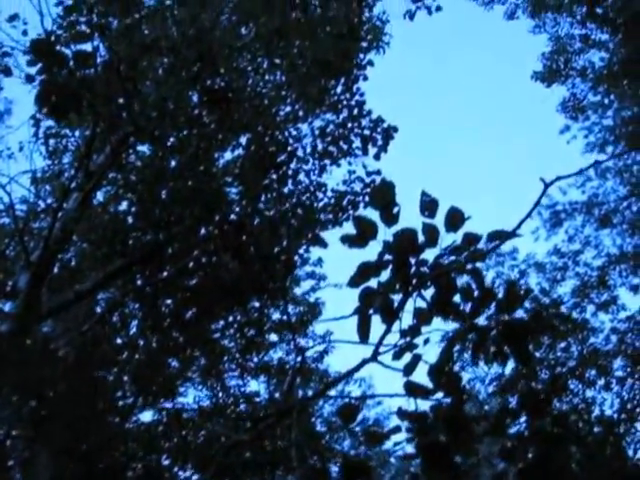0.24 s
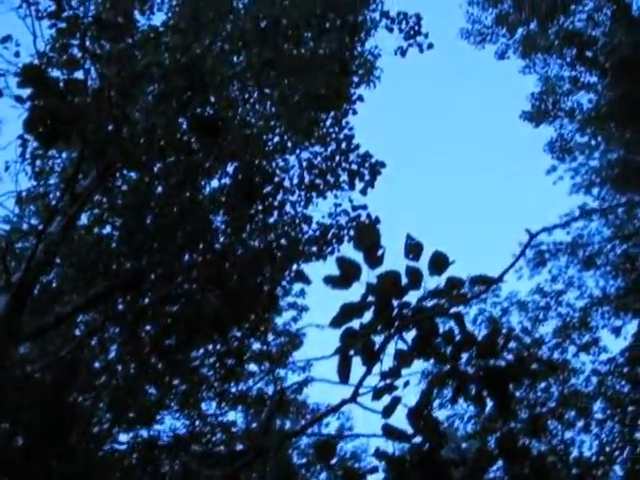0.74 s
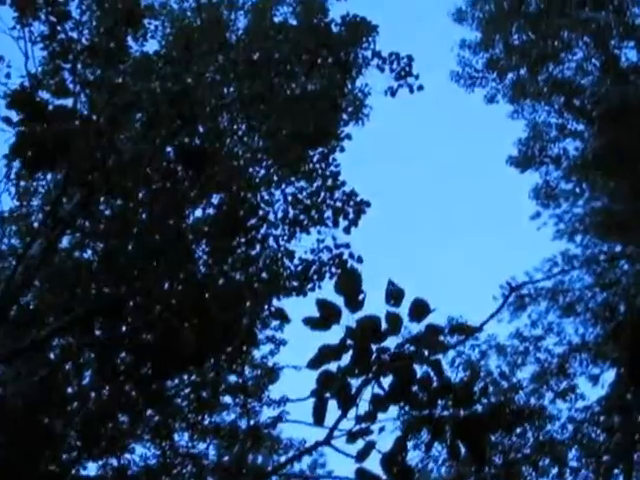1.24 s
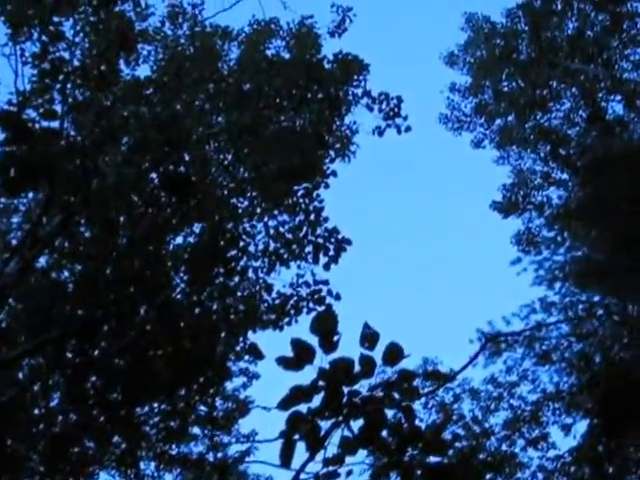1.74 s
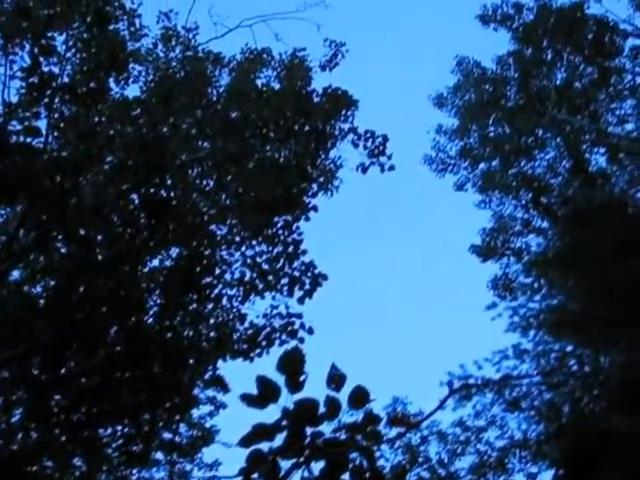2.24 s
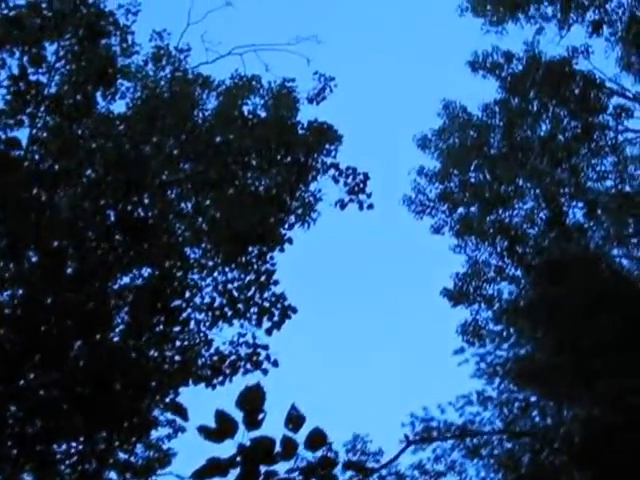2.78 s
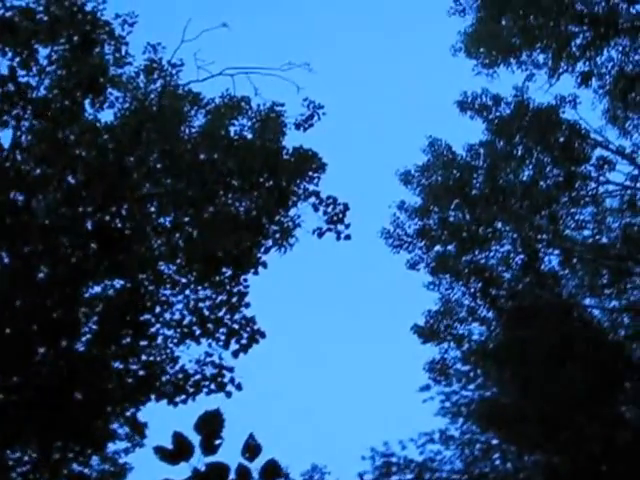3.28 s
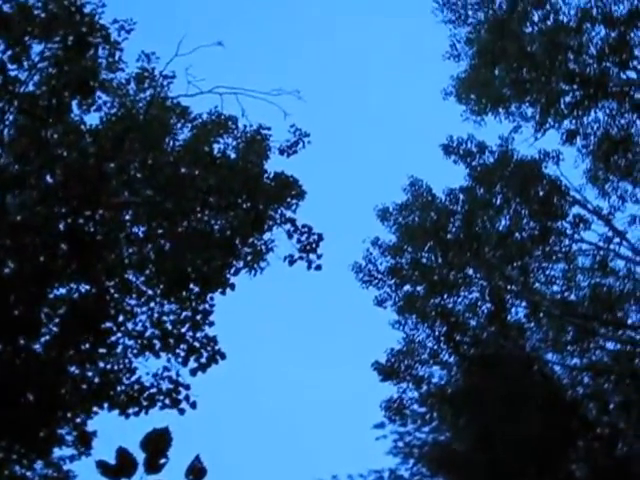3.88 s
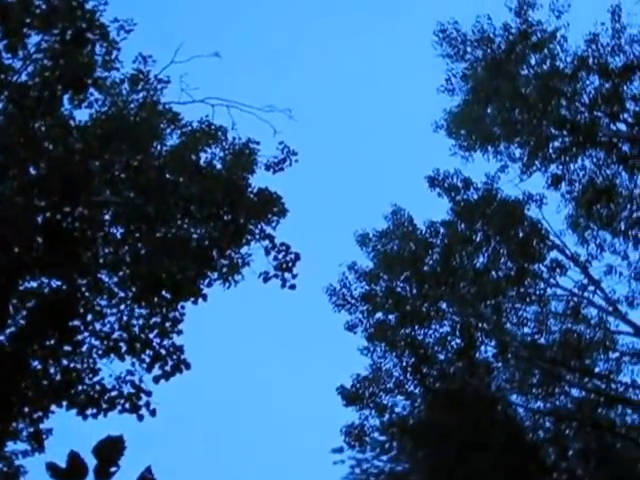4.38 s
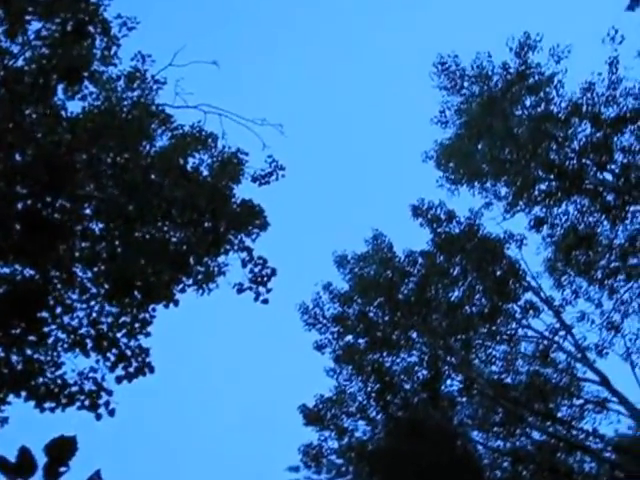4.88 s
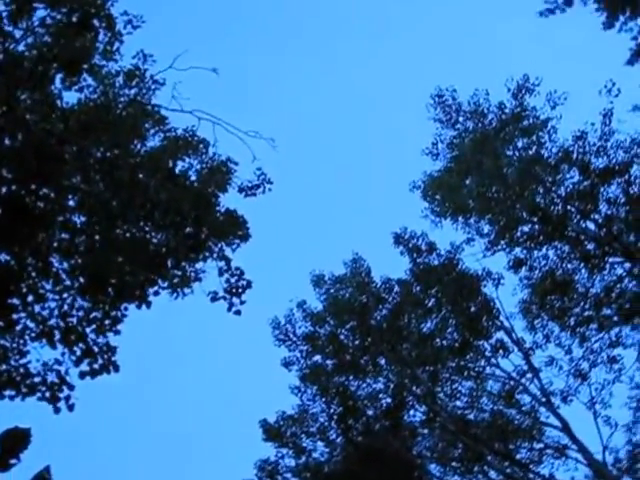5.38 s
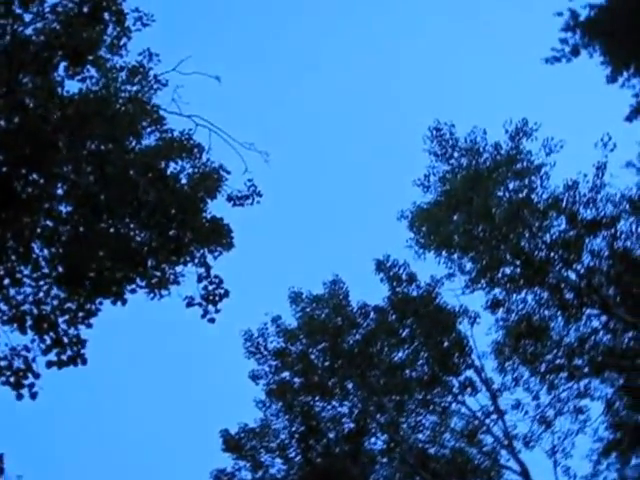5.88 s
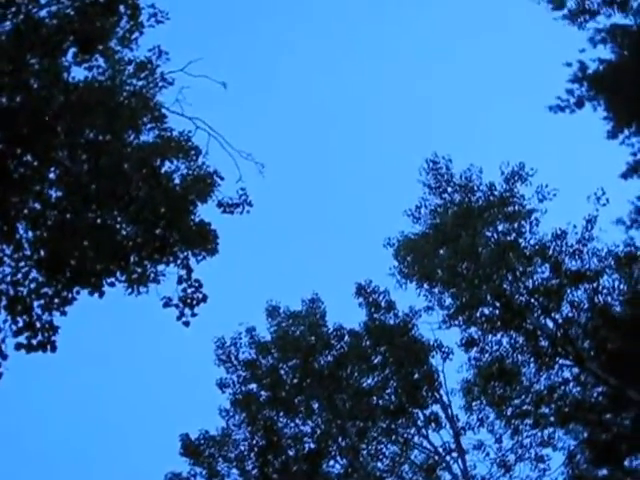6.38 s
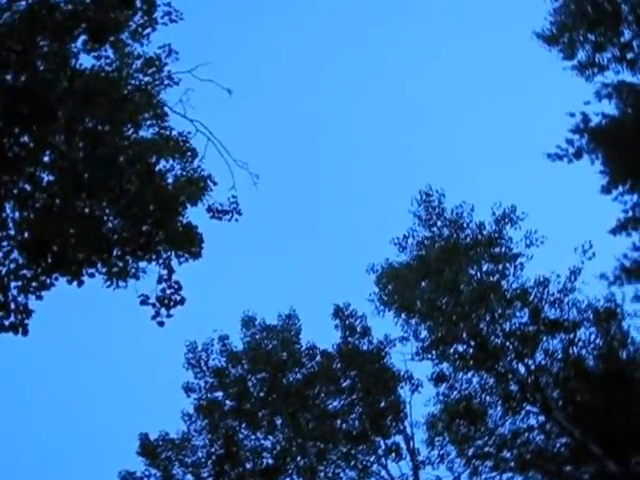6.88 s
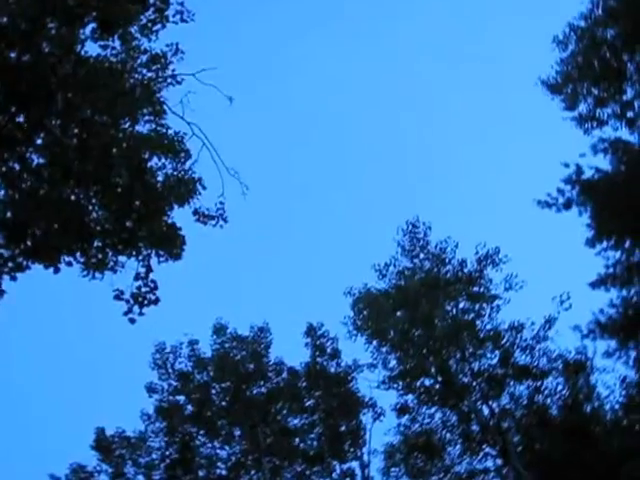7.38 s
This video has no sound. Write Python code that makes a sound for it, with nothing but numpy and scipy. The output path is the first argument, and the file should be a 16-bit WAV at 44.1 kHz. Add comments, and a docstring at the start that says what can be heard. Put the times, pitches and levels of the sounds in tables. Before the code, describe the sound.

In a leafy wood at dawn, a flycatcher gives a bright rising chip and short burr about every half to one second, answered by a fainter, echoing one. A sparrow whistles three long descending notes, then broken triplets, ending before the middle. A faint woodpecker roll passes beneath. Short slurred bird phrases follow, over a constant far chorus, hiss and leaf murmur, with low wind thumping a stereo microphone, mainly left later.

```python
"""Dawn birds in a leafy wood

Flycatchers call a quick rising chip and a burr, a sparrow whistles three long falling notes, then broken
triplets. Other birds slur short phrases or coo over a far chorus. Most are gliding, nearly pure tones;
the coo holds steady and the far chorus includes a noise wash. A woodpecker's roll and close ticks are
short ringing tones; wind, leaves, a low drone and hiss are shaped noise. Birds and drum get echoes off
the trunks, except the coo and the wash. All is heard at two microphone ports."""
import sys
import numpy as np
from scipy import signal
from scipy.fft import rfft, irfft, next_fast_len
from scipy.io import wavfile
from scipy.ndimage import uniform_filter1d

SR = 44100
rng = np.random.default_rng(int(sys.argv[2]) if len(sys.argv) > 2 else 0)


def int16_out(signal):
    """Quantize to a 16-bit WAV file."""
    q = np.round(np.clip(np.atleast_2d(signal).T, -1, 1) * 32767)
    wavfile.write(sys.argv[1], SR, q.astype(np.int16))


N = 336483


def undb(db):
    """Turn a level in dB into a plain gain."""
    return 10 ** (np.asarray(db) / 20)


def unit(x):
    """Scale a sound to an rms (average strength) of 1."""
    return x / np.sqrt(np.mean(x ** 2))


def track(table):
    """Join the points of a time table with straight lines, one curve per column."""
    s, *columns = np.transpose(table)
    return [np.interp(np.arange(N) / SR, s, column) for column in columns]


def coloured(shape, channels):
    """Noise whose spectrum follows (pitch_hz, level_db) points, scaled to rms 1."""
    size = next_fast_len(N)
    point_hz, point_db = np.transpose(shape)
    bin_hz = np.arange(1, size // 2 + 2) * SR / size
    level_db = np.interp(np.log(bin_hz), np.log(point_hz), point_db, left=-60, right=-60)
    white = rng.standard_normal((channels, size))
    return unit(irfft(rfft(white) * undb(level_db), size)[:, :N])


def walk(rate):
    """A random wandering level: held for 1 / rate seconds, smoothed twice, with spread 1."""
    hold = int(SR / rate)
    steps = np.repeat(rng.standard_normal(N // hold + 1), hold)
    smooth = uniform_filter1d(uniform_filter1d(steps, hold), hold)[:N]
    return smooth / smooth.std()


def add(bus, sound, s):
    """Mix a sound into the bus, starting at time s in seconds."""
    i = int(round(s * SR))
    lo, hi = max(i, 0), min(i + sound.shape[-1], N)
    if hi > lo:
        bus[..., lo:hi] += sound[..., lo - i:hi - i]


def placed(sound, pan_db, samples_per_db=2.5):
    """Place a sound: a positive pan is louder at the left port and moves its arrival there earlier."""
    # at pan 0 the right port is two samples ahead
    lead = int(round(np.mean(pan_db) * samples_per_db)) - 2
    left_wait, right_wait = max(-lead, 0), max(lead, 0)
    left = np.pad(sound * undb(pan_db / 2), (left_wait, right_wait))
    right = np.pad(sound * undb(-pan_db / 2), (right_wait, left_wait))
    return np.array([left, right])


def whistle(s, hz, db, octave_db=-38, smooth=True, loud_hz=0, db_per_khz=0):
    """A bird's nearly pure tone, gliding between turning points (s, hz, rms db), with a faint octave."""
    t = np.arange(s[0], s[-1], 1 / SR)
    place = np.interp(t, s, np.arange(len(s)))
    if smooth:  # ease off partly around each turning point
        place = place - np.sin(2 * np.pi * place) / (2 * np.pi) * 0.33
    hz = np.interp(place, np.arange(len(s)), hz)
    away_khz = abs(hz - loud_hz) / 1000  # distance from the throat's best pitch
    level_db = np.interp(t, s, db) + db_per_khz * (away_khz - away_khz.mean())
    fade = np.clip(np.minimum(t - s[0], s[-1] - t) / 0.00076, 0, 1)
    phase = 2 * np.pi * np.cumsum(hz) / SR
    tone = np.sin(phase) + undb(octave_db) * np.sin(2 * phase)
    return np.sqrt(2) * fade * undb(level_db) * tone


def ring(hz, t60):
    """A struck object's tone, dying by 60 dB in t60 seconds; contact lasts about half a cycle."""
    t = np.arange(int(t60 * SR)) / SR
    contact = np.minimum(2 * hz * t, 1)
    return np.sin(2 * np.pi * hz * t) * np.exp(-np.log(1000) * t / t60) * contact


WOOD_NEAR, WOOD_FAR = (0.58, 0), (0.8, -3)  # echo tails: (time to fall 60 dB in s, level_db)
FAR_DULL_HZ = 3630  # the far tail loses treble above this


def wood(x, grain_db=0.5):
    """Echoes scattered by trunks and leaves: a quick and a slow noise tail, different at each port."""
    t = np.arange(int(1.4 * SR)) / SR
    near, far = (undb(db - 60 * t / t60) * rng.standard_normal((2, len(t))) for t60, db in (WOOD_NEAR, WOOD_FAR))
    # random level changes make the first echoes uneven
    near = near * undb(grain_db * rng.exponential(size=(2, len(t))) * np.exp(-t / .025))
    # long paths through leaves lose treble
    far = signal.lfilter(*signal.butter(1, FAR_DULL_HZ, fs=SR), far)
    echoes = (near + far) * (t > 0.0018)  # no echo in the first 1.8 ms
    echoes /= np.sqrt(np.sum(echoes ** 2) / 2)  # unit energy at each port, on average
    return signal.fftconvolve(x[None], echoes, axes=1)[:, :N]


# wind strength at each port, before gusts and brightening: start_s, left_level_db, right_level_db
WIND_LEVEL = [(0.05, -73, -62), (0.59, -61, -56), (0.82, -64, -58), (1.3, -55, -49), (2.15, -55.5, -52.5),
              (2.79, -50.5, -48.5), (3.4, -52.5, -51.5), (3.65, -53.5, -76), (4.04, -45.5, -75),
              (4.45, -53.5, -57), (4.65, -43.5, -70), (4.9, -50, -66), (5.09, -44, -55), (5.2, -45.5, -62),
              (5.46, -37, -50), (5.55, -49.5, -60), (5.74, -30, -60), (5.79, -45, -60), (5.86, -30.5, -60),
              (5.98, -43.5, -58), (6.05, -38, -62), (6.28, -54, -59), (6.45, -56.5, -61), (6.9, -65, -51.5),
              (6.97, -68, -39.5), (7.12, -64, -44.5), (7.3, -62, -55)]
# tone of the wind rumble: pitch_hz, relative level_db per Hz
WIND_TONE = [(12, -48), (20, -12), (59, 0), (92, 1), (130, -4), (178, -11.5), (300, -29.5), (390, -31.5),
             (660, -120)]
GUST_SPLIT_HZ, GUST_USUAL_DB = 80, -44
GUST_BRIGHT = 0.27  # dB the highs gain, and the lows lose, per dB of wind above the usual


def wind():
    """Wind buffets each port on its own: low noise, with stronger gusts sounding brighter."""
    gusts_db = np.array([db + 3 * walk(18) for db in track(WIND_LEVEL)])
    buffet = coloured(WIND_TONE, channels=2)
    low = signal.filtfilt(*signal.butter(2, GUST_SPLIT_HZ, fs=SR), buffet)
    bright = undb(GUST_BRIGHT * (gusts_db - GUST_USUAL_DB))
    return (low / bright + (buffet - low) * bright) * undb(gusts_db)


# leaves and distance, before the mixing gains: start_s, level_db
MURMUR_LEVEL = [(0.0, -57), (0.85, -56.5), (1.53, -52.5), (2.51, -56.5), (7.63, -56.5)]
# tone of the murmur: pitch_hz, relative level_db per Hz
MURMUR_TONE = [(150, -7), (280, -4.5), (400, -2), (600, -4.5), (800, 1.5), (950, -5), (1250, -2),
               (1700, -7), (2400, -0.5), (4000, -19.5)]


def murmur(alike=.6, flutter_db=1.2):
    """Leaves and distance: fluttering noise, partly shared by the two ports."""
    flutter = undb(flutter_db * np.array([walk(9), walk(8.1)]))
    shared, opposite = coloured(MURMUR_TONE, channels=2) * flutter
    pair = np.sqrt(1 + alike) * shared + np.sqrt(1 - alike) * opposite * np.array([[1], [-1]])
    pair[0] = np.roll(pair[0], 5)  # it reaches the right port 5 samples earlier
    return pair * undb(track(MURMUR_LEVEL)[0] - 2.5)


# a low drone that comes and goes, before a 3.5 dB cut: start_s, level_db
DRONE_LEVEL = [(0, -67.5), (1.2, -63.5), (2.8, -71.5), (3.2, -74.5), (6.4, -83), (7.63, -73)]


def drone():
    """A low drone: a narrow band of noise near 270 Hz, the same at both ports."""
    band = coloured([(200, -34), (270, 8), (360, -25)], channels=1)
    return band * undb(track(DRONE_LEVEL)[0] - 3.5)


# tone of the circuit hiss: pitch_hz, relative level_db per Hz
HISS_TONE = [(100, -13), (2000, 2.5), (7500, 0.5), (9000, -4), (12500, -4), (14000, -9), (16000, -12)]


def hiss(level_db=-56.5, flutter_db=1.2):
    """The circuits hiss: separate noise at each port, with one shared flutter around its level."""
    return coloured(HISS_TONE, channels=2) * undb(level_db + flutter_db * walk(14))


# loudness of all the far birds, before the mix of songs and wash: start_s, level_db
CHORUS_LEVEL = [(0.0, -45.5), (0.66, -41.5), (1.4, -44.5), (3.08, -41.5), (6.0, -44), (7.63, -46.5)]
# the farthest birds, blurred to a wash: pitch_hz, relative level_db per Hz
WASH_TONE = [(1500, -14), (2100, -5.5), (2700, 5.5), (4000, 1), (5500, -0.5), (6800, -13), (7600, -45)]


def chorus(count=500, middle_hz=3300, spread=.22, swing=.16, note_s=.07):
    """Many far birds: random short slurs heard only as echo, over a wavering wash of noise."""
    song = np.zeros(N)
    for k, (when, pitch, size, *turns) in enumerate(rng.standard_normal((count, 7))):
        shift = spread * pitch + swing * np.array(turns)
        hz = middle_hz * np.exp(.65 * np.tanh(shift / .65))  # tanh limits the range
        level_db = 3 * size + np.array([1, -5.5, -3.0, -15.0])
        add(song, whistle(note_s * np.arange(4) / 3, hz, level_db), (k + when) * N / SR / count)
    wash = coloured(WASH_TONE, channels=2) * undb(-7 + 2.1 * np.array([walk(7), walk(8)]))
    return (unit(wood(song, grain_db=-1.5)) * undb(-7.0) + wash) * undb(track(CHORUS_LEVEL)[0])


# chip: climbs a bent quarter sine from a share of its top pitch, then holds
CHIP_S, CHIP_FROM = .029, .53  # length in s, starting share of the top pitch
CHIP_CLIMB, CHIP_ENDS_DB = 0.77, -19  # share of the time spent climbing, level of the ends against the middle
# burr: a scoop leads into quick swings between a low and a high pitch
BURR_AFTER_S, SCOOP_S = .092, .0055  # burr's end after the chip; scoop's start before the nominal first turn
SCOOP_HZ, SCOOP_DB = 2500, -8
SWING_S, LOW_HZ, HIGH_HZ = .004, 3452, 5827  # time between turns, and their nominal pitches
HIGH_DB, FIRST_DB = -3, 1  # high turns are softer; a small boost fades over the first turns
RISE_EARLY_S = .0012  # later high turns come early, so the pitch snaps up and slides down
BURR_LOUD_HZ, BURR_DB_PER_KHZ = 4760, -5  # loudest when passing the throat's pitch
TEMPO_SPREAD, TURN_SCATTER_DB, TURN_SPREAD = .03, 2.5, 0.0239  # chance in tempo, turn level, turn pitch
FAR_BELOW_DB = -30  # calls with a quieter chip come from the far perch
# flycatcher calls, before shaping; pan is left minus right:
# chip_time_s (near its middle), chip_top_pitch_hz, chip_level_db, burr_level_db, pan_db
FLYCATCHER_CALLS = [ (0.073, 6560, -38, -41.5, 4.5), (0.425, 6840, -26.5, -31.5, 6.5),
                    (0.876, 6650, -38.5, -42, 7.5), (1.246, 6725, -25.5, -30.5, -0.5),
                    (1.563, 7170, -49.5, -64, 0), (1.661, 6640, -38, -43.5, 10),
                    (2.086, 6730, -25, -30, -0.8), (2.683, 6950, -25.5, -31.5, -0.5),
                    (2.763, 6500, -37.5, -44, 10.5), (3.34, 6790, -24, -31, -0.5),
                    (3.73, 6440, -37.5, -44.5, 10.5), (4.367, 6740, -23.5, -31, -0.5),
                    (4.524, 6430, -38.5, -46.5, 10.5), (4.981, 6860, -25, -31, 5),
                    (5.403, 6470, -39.5, -47, 11), (6.266, 6705, -24, -31.5, 1.28),
                    (6.878, 6850, -24, -29, 1), (7.426, 6470, -40, -44, 5.5), (7.627, 6770, -44, -45, 5.5),
                    ]


def flycatchers(near_echo_db=-1.5, far_echo_db=6.5):
    """Flycatchers on two perches: a rising chip and a swinging burr, with more echo from the far one."""
    dry, wet = np.zeros((2, N)), np.zeros((2, N))
    u = np.linspace(0, 1, 30)
    climb = CHIP_FROM + (1 - CHIP_FROM) * np.sin(np.pi / 2 * np.minimum(u / CHIP_CLIMB, 1)) ** 1.3
    turn = np.arange(1, 10)
    is_high = turn % 2  # turns go high, low, high, ..
    # the first high turn comes late and rises less far
    turn_s = SWING_S * turn - RISE_EARLY_S * is_high * np.sign(turn - 2)
    turn_hz = LOW_HZ + (HIGH_HZ - LOW_HZ) * is_high * np.minimum(.38 * turn - .1, 1)
    turn_db = HIGH_DB * is_high + FIRST_DB * np.clip(1 - turn / 4.0, 0, 1)
    # put the scoop in front and a short upward flick at the end
    burr_s = np.r_[SWING_S - SCOOP_S, turn_s, SWING_S * turn[-1] + .001]
    burr_hz = np.r_[SCOOP_HZ, turn_hz, HIGH_HZ * 1.17]
    burr_shape_db = np.r_[SCOOP_DB, turn_db, -5]
    for s, top_hz, chip_db, burr_db, pan_db in FLYCATCHER_CALLS:
        tempo = 1 + TEMPO_SPREAD * np.tanh(rng.standard_normal())
        pitch, size = rng.standard_normal((2, len(burr_s)))
        chip_level_db = chip_db + CHIP_ENDS_DB * (2 * u - 1) ** 2
        chip = whistle(CHIP_S * u, climb * top_hz, chip_level_db, octave_db=-33.5, smooth=False)
        burr = whistle(burr_s * tempo, burr_hz * (1 + TURN_SPREAD * pitch),
                       burr_shape_db + burr_db + TURN_SCATTER_DB * size, octave_db=-31.5,
                       loud_hz=BURR_LOUD_HZ, db_per_khz=BURR_DB_PER_KHZ)
        perch = int(chip_db < FAR_BELOW_DB)  # 0 near, 1 far
        for note, at in ((chip, s - .47 * CHIP_S), (burr, s + BURR_AFTER_S - len(burr) / SR)):
            add(dry, placed(note, pan_db), at)
            add(wet[perch], note, at)
    return dry + undb(near_echo_db) * wood(wet[0]) + undb(far_echo_db) * wood(wet[1])


SLUR_ENDS_DB = -3.5  # softer ends, used by the coo and the slurs


def coo(start_s=.085, length_s=.16, pitch_hz=468, level_db=-62):
    """A faint low coo far off: one steady tone with softened ends."""
    out = np.zeros((2, N))
    u = np.linspace(0, 1, 60)
    note = whistle(length_s * u, pitch_hz + 0 * u, level_db + SLUR_ENDS_DB * (2 * u - 1) ** 4)
    add(out, placed(note, 0.), start_s)
    return out


# small ticks and knocks close by; level is per ringing tone before panning, pan is left minus right:
# start_s, level_db, pitch_hz, ring_s (time to fall 60 dB), pan_db
TICKS = [(.189, -30, 2210, 0.014, 6), (.456, -46, 1180, 0.021, 13), (3.3602, -40, 1010, 0.061, 10),
         (6.608, -44, 860, 0.026, 3)]
# the tones in one tick: share of its pitch (no unit)
TICK_SHARES = [0.86, 1, 1.168]


def ticks():
    """Close ticks: three neighbouring tones ring briefly together."""
    out = np.zeros((2, N))
    for s, db, hz, t60, pan_db in TICKS:
        tick = sum(ring(share * hz, t60) for share in TICK_SHARES)
        add(out, placed(tick * undb(db), pan_db, samples_per_db=0.5), s)
    return out


# three long notes and then broken triplets, before scoop and waver:
# start_s, length_s, from_pitch_hz, to_pitch_hz
SPARROW_NOTES = [ (0.416, 0.73, 4111, 4059), (1.187, 0.67, 3727, 3795), (1.765, 0.57, 3017, 3028),
                 (2.361, 0.14, 3023, 3026), (2.512, 0.16, 3035, 3028), (2.663, 0.066, 3110, 3137),
                 (2.761, 0.14, 3110, 3050), (2.882, 0.17, 3075, 3000), (3.055, 0.24, 3100, 3094),
                 (3.268, 0.11, 3084, 3040), ]
# swelling and dropping out on the way through the leaves, before note edges and port fading:
# start_s, level_db
SPARROW_LEVEL = [ (.42, -48), (.53, -45), (.594, -54), (.61, -41), (.63, -40.5), (.708, -48), (.785, -45.5),
                 (.803, -46), (.828, -35.5), (.864, -41.5), (.884, -48), (.906, -39.5), (.965, -47),
                 (1.01, -50), (1.055, -61), (1.09, -59), (1.165, -54), (1.2, -59), (1.25, -45),
                 (1.32, -46.5), (1.368, -60), (1.395, -37), (1.417, -51), (1.45, -36), (1.465, -51),
                 (1.48, -36), (1.505, -61), (1.54, -46), (1.59, -45), (1.614, -51), (1.67, -45),
                 (1.686, -51), (1.728, -46.5), (1.77, -54.5), (1.85, -53), (1.885, -41), (1.92, -43),
                 (1.94, -52), (2.016, -46), (2.04, -59), (2.058, -41.5), (2.09, -51), (2.112, -43.5),
                 (2.25, -50.5), (2.29, -52), (2.35, -60), (2.38, -52.5), (2.446, -48.5), (2.52, -52.5),
                 (2.596, -40.5), (2.63, -46), (2.69, -48), (2.716, -43), (2.798, -47.5), (2.895, -53),
                 (2.99, -43.5), (3.04, -56), (3.07, -43), (3.125, -45.5), (3.204, -39.5), (3.255, -55),
                 (3.3, -52), (3.38, -47), ]
EDGE_S, EDGE_DB = 0.017, -0.5  # how quickly note edges settle, and their level
WAVER_HZ, SCOOP_UNDER_HZ = 16.5, 30  # waver before smoothing; notes scoop in from under pitch


def sparrow(echo_db=-3, fading_db=2.5):
    """Sparrow whistles: wavering tones that fade at each port as moving leaves shift the paths."""
    song = np.zeros(N)
    u = np.linspace(0, 1, 60)
    for s, length, from_hz, to_hz in SPARROW_NOTES:
        head, tail = np.exp(-u * length / EDGE_S), np.exp((u - 1) * length / EDGE_S)
        waver = uniform_filter1d(rng.standard_normal(len(u)), size=3)
        hz = from_hz + (to_hz - from_hz) * u - SCOOP_UNDER_HZ * head + WAVER_HZ * waver
        add(song, whistle(length * u, hz, EDGE_DB * (head + tail), octave_db=-60, smooth=False), s)
    song = song * undb(track(SPARROW_LEVEL)[0])
    faded = song * undb(fading_db * np.array([walk(42.3), walk(41.8)]))
    return faded + wood(faded[0] * undb(echo_db))


# ringing tones of the hollow trunk, before chance and the drum level:
# pitch_hz, ring_s (time to fall 60 dB), level_db
TRUNK_TONES = [(360, .05, -4), (760, .05, -2), (1000, .04, -4), (1230, .05, 0)]
DRUM_FROM_S, DRUM_GAP_S, DRUM_BLOWS, DRUM_DB = 1.79, .1002, 11, -45


def woodpecker(echo_db=-7.):
    """A woodpecker's roll: evenly spaced blows ring a hollow trunk."""
    drum = np.zeros(N)
    for blow in range(DRUM_BLOWS):
        knock = np.zeros(SR // 10)
        for hz, t60, mode_db in TRUNK_TONES:
            c = rng.standard_normal()  # each tone's pitch and level differ a little
            add(knock, ring(hz * (1 + .02 * c), t60) * undb(DRUM_DB + mode_db + 2 * c), 0)
        # twigs along the way smear each blow over about 20 ms
        smear = rng.standard_normal(900) * np.hanning(900) * (rng.random(900) < .03)
        smear = smear / np.sqrt(np.sum(smear ** 2))
        add(drum, signal.fftconvolve(knock, smear), DRUM_FROM_S + blow * DRUM_GAP_S)
    return drum + undb(echo_db) * wood(drum)


# slurred phrases: a glide with a warble of round tops and tighter dips; it starts on top, or at the
# bottom if the swing is negative; pitch, swing and level are before shaping; echo is above the direct sound:
# start_s, length_s, from_pitch_hz, to_pitch_hz, swing_hz, turns (count), level_db, echo_db
SLUR_PHRASES = [ (2.264, 0.076, 3050, 2990, -400, 1.15, -55.5, 12),
                (2.953, 0.041, 4265, 4125, 80, 0.94, -44.5, 1),
                (3.17, 0.064, 2526, 2480, 33, 0.45, -57.5, 5),
                (3.839, 0.28, 3700, 3854, 330, 9.7, -60.5, 14),
                (3.986, 0.025, 2650, 2800, 330, 0.71, -51, 6),
                (3.988, .08, 4800, 4890, 280, 3.5, -57.5, 12), (4.018, .02, 2410, 2380, 20, .4, -49, 3),
                (4.092, 0.025, 2870, 2520, 30, 0.4, -47, 6), (4.139, 0.05, 2900, 2333, 33, 0.42, -48.5, 5),
                (4.2, .12, 3640, 3810, 263, 3.6, -60, 11), (4.877, 0.037, 2750, 2830, 227, 0.9, -58, 8),
                (4.947, 0.041, 2850, 2710, 330, 0.48, -48, 6),
                (4.997, 0.027, 2755, 2310, 25, .4, -49.5, 4.5),
                (5.093, 0.086, 3100, 2850, 34, 0.46, -51.5, 7),
                (5.185, 0.058, 2895, 2847, 21, 0.49, -46.5, -2),
                (5.692, 0.038, 2420, 2400, 30, .4, -55.5, 5.5),
                (5.889, 0.19, 4860, 4760, 320, 7.6, -63.5, 12), (5.965, 0.031, 2110, 2095, 15, .4, -54, -1),
                (6.055, .035, 2864, 3030, 30, 0.36, -49, 3),
                (6.025, 0.056, 2604, 2590, 350, 0.83, -51.5, 5.5),
                (6.107, 0.0255, 4100, 3850, 20, .4, -50.5, 7),
                (6.131, 0.049, 3400, 2370, 58, 0.47, -46.5, 5.5),
                (6.774, 0.17, 3576, 3470, -660, 1.28, -50, 2), (6.837, .05, 2430, 2270, 30, 0.37, -58, 5),
                (7.081, 0.081, 2823, 2780, 396, 1.84, -47, 4),
                (7.154, 0.042, 2420, 3660, 31, .4, -47.5, 7.5), ]
SLUR_DIP_ROUND = .2  # 0 = pointed dips
SLUR_DB_PER_KHZ, SLUR_BREAK_DB = -5, 2.5  # low turns are louder; spread of the leaves' flicker


def slurs(pan_db=7.5):
    """Slurred bird phrases: short warbling glides, their level broken up by leaves."""
    dry, wet = np.zeros((2, N)), np.zeros(N)
    u = np.linspace(0, 1, 60)
    for s, length, from_hz, to_hz, swing_hz, turns, db, echo_db in SLUR_PHRASES:
        wave = np.cos(np.pi * (turns * u + (swing_hz < 0) / 2))
        warble = 2 * np.hypot(wave, SLUR_DIP_ROUND) - 1 - SLUR_DIP_ROUND
        hz = from_hz + (to_hz - from_hz) * u + abs(swing_hz) * warble
        tilt_db = SLUR_DB_PER_KHZ * (hz - hz.mean()) / 1000
        level_db = db + tilt_db + SLUR_ENDS_DB * (2 * u - 1) ** 4
        tone = whistle(length * u, hz, level_db, smooth=False)
        broken = tone * undb(SLUR_BREAK_DB * walk(73.0)[:len(tone)])
        # louder at the left port, arriving there only slightly earlier
        add(dry, placed(broken, pan_db, samples_per_db=.6), s)
        add(wet, tone * undb(echo_db), s)
    return dry + wood(wet)


def scene():
    """All the air, birds and knocks at the two ports."""
    air = wind() + murmur() + drone() + hiss()
    birds = chorus() + flycatchers() + coo() + sparrow() + slurs()
    return air + birds + ticks() + woodpecker()


def record(dry):
    """The recorder cuts the top: a steep filter removes sound above 15740 Hz."""
    return signal.sosfilt(signal.ellip(10, .2, 80, 15740, fs=SR, output="sos"), dry)


dry = scene()
out = record(dry)
int16_out(out)
```